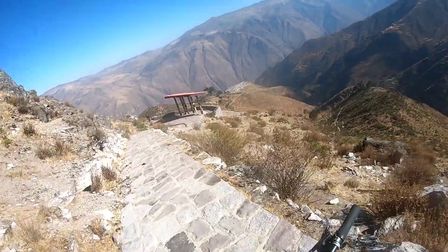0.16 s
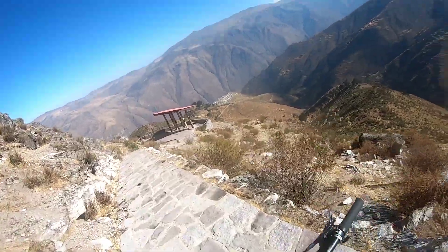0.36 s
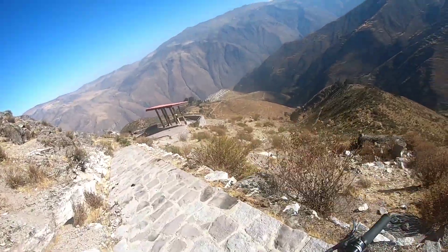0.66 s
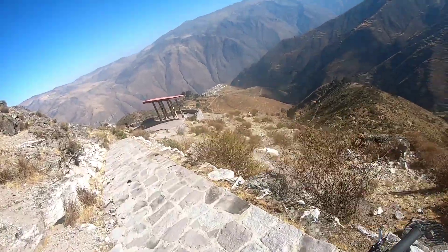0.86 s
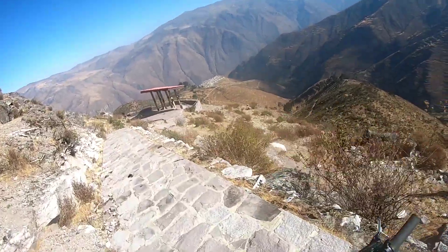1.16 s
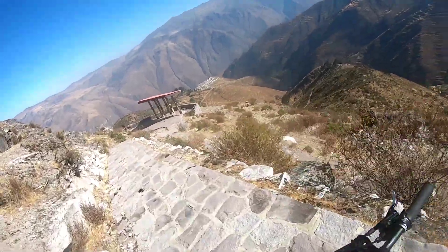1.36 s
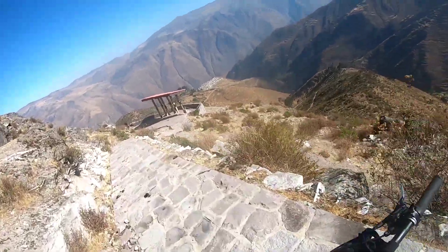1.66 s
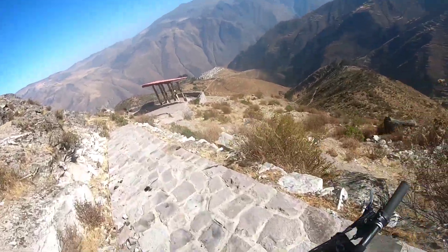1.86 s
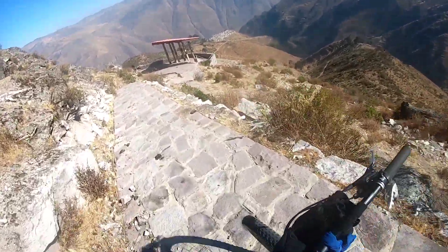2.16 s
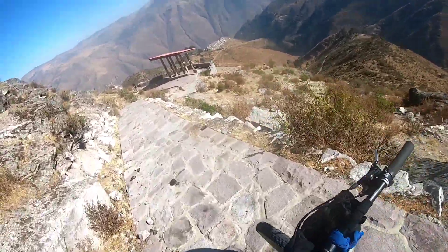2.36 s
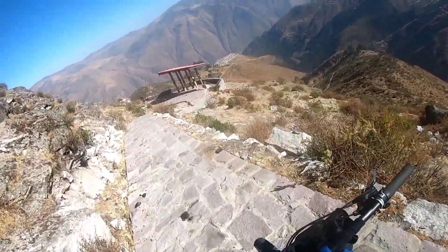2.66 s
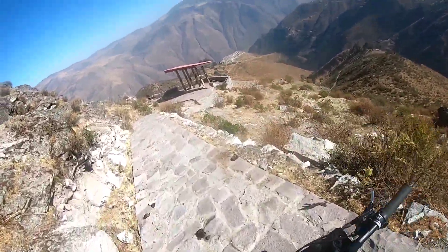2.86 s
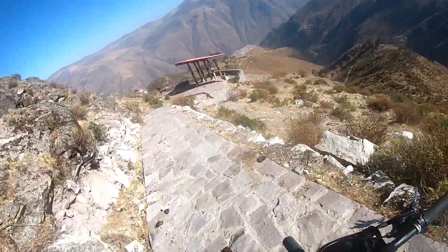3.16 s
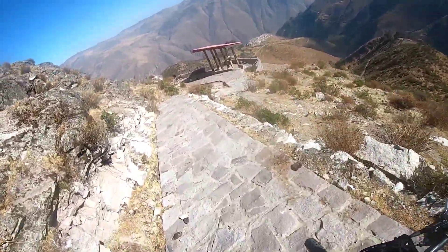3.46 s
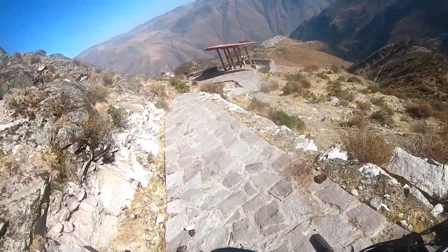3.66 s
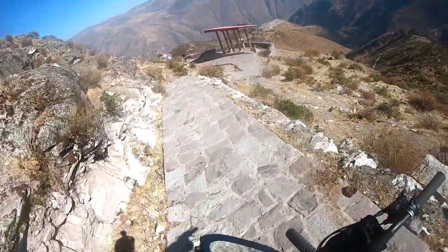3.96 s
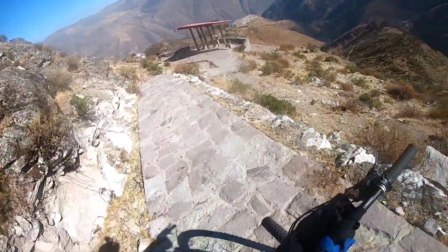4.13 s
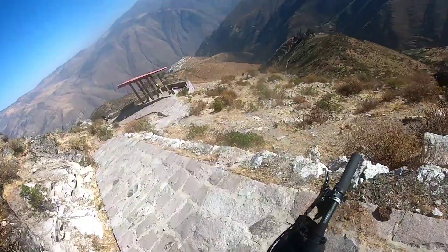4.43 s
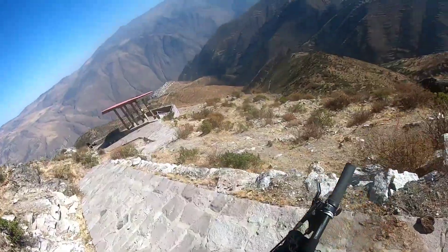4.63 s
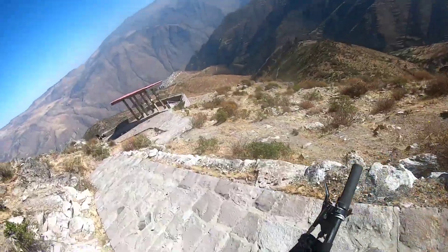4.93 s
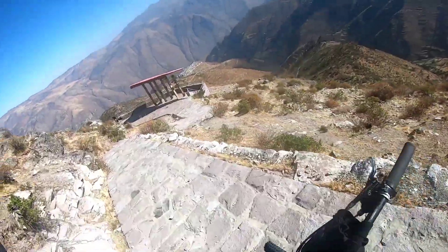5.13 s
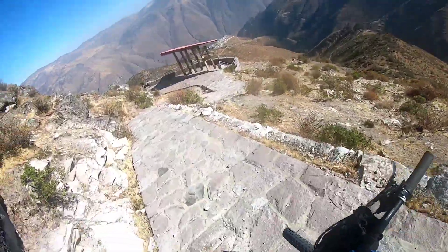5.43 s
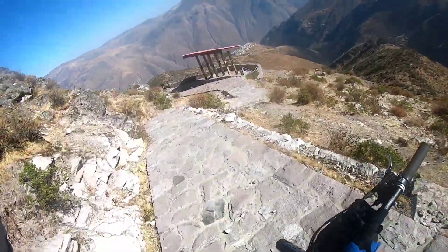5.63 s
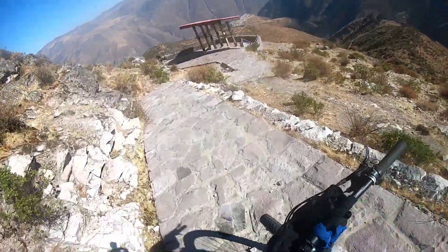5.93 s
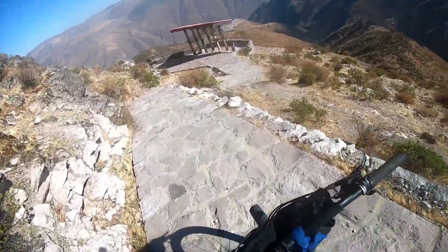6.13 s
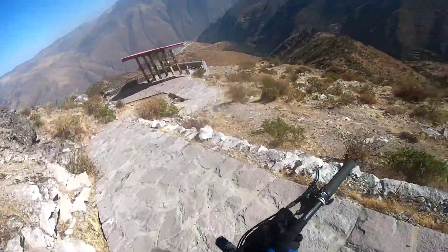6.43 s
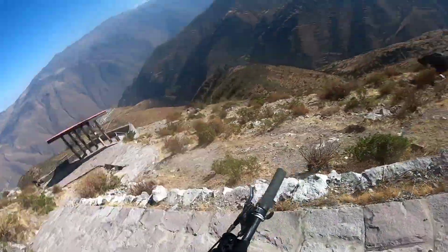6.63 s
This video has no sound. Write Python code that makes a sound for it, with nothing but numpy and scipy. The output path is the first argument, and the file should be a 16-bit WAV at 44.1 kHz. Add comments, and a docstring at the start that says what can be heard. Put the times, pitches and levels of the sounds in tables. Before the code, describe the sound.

Outdoors on an open stone path, a walker pushes a bicycle. Hard, irregular clacks of soles on slabs come with gritty scuffs and dull body thuds. A thin metallic freewheel tick runs quickly throughout, about sixteen a second. Low wind buffets the body-worn microphone in bursts, strongest in the later half, over faint airy hiss.

```python
"""Wind buffets a microphone port first, and at once hard soles clack on stone and a bicycle's freewheel ticks.
A walker wheels the bicycle along a stone path on a windy hillside; the camera they wear hears it.
Wind, hillside hiss and tyre rumble are shaped noise; scuffed grit is many tiny damped tones over hiss.
Clacks are short bursts of noise through stone resonances, and ticks are struck groups of metal tones.
Body thuds are wavering low rings; loose parts jingle, and frame and rim hum as narrow bands of noise."""
import sys
import numpy as np
from scipy import signal
from scipy.fft import rfft, irfft, next_fast_len
from scipy.io import wavfile
from scipy.ndimage import uniform_filter1d, map_coordinates

SR = 44100
rng = np.random.default_rng(int(sys.argv[2]) if len(sys.argv) > 2 else 0)


def store_pcm(level_fs):
    """Save levels as 16-bit WAV."""
    pcm = np.round(np.clip(level_fs, -1, 1) * 32767).astype(np.int16)
    wavfile.write(sys.argv[1], SR, np.atleast_2d(pcm).T)


N = 299439

# Spectra all have the columns: pitch_hz, level_db (per Hz, only the shape matters).
# Wind strength on the port. Columns: time_s, deep_db, flutter_db, roar_db
WIND_LEVELS = [(0.0, -45.5, -37.5, -54), (0.62, -35.5, -42, -55.5), (0.89, -42.5, -42.5, -57),
               (1.11, -46, -47.5, -59.5), (1.49, -36, -41, -82), (1.81, -34, -35, -50.5),
               (2.12, -33, -37.5, -45), (2.31, -37, -48, -64), (2.7, -35, -42, -53),
               (2.93, -41.5, -46, -63), (3.25, -40, -40, -45.5), (3.48, -33.5, -48, -62.5),
               (4.01, -38, -52, -73.5), (4.22, -26, -35, -44), (4.35, -37.5, -34.5, -75),
               (4.88, -31, -40, -54), (5.09, -36, -32, -48), (5.54, -37, -38, -47.5),
               (5.8, -32.5, -39.5, -60), (6.05, -34.5, -39.5, -48), (6.31, -43, -37, -71),
               (6.79, -31.5, -47, -64)]
# Bursts of buffeting. Columns: loudest_s, deep_db, flutter_db, roar_db
WIND_BURSTS = [(0.327, -43, -31, -31.5), (.46, -43, -51, -46.5), (.62, -33.5, -39, -49.5),
               (.73, -44, -36, -44), (1.26, -34.5, -25.5, -30), (1.318, -39, -45, -36),
               (1.579, -22.5, -34, -67), (1.72, -39, -27, -38.5), (1.806, -22.5, -23.5, -56.5),
               (2.221, -26.5, -24.5, -37.5), (2.675, -27.5, -20.5, -42.5), (2.87, -31, -55, -68),
               (2.99, -45, -47.5, -46.5), (3.181, -26, -31.5, -38), (3.29, -26.5, -36.5, -55),
               (3.5, -28.5, -44, -51), (3.665, -30, -24.5, -35), (3.814, -33, -37, -46),
               (4.192, -21.5, -23, -37), (4.648, -22.5, -21.5, -30), (4.961, -30, -30.5, -36.5),
               (5.123, -14, -23.5, -37), (5.21, -18, -29.5, -48), (5.501, -32, -34.5, -40),
               (5.58, -24.5, -31.5, -37.5), (5.91, -32.5, -33.5, -46.5), (6.05, -23.5, -34, -38),
               (6.139, -26, -29, -54), (6.52, -29, -26.5, -35.5)]
# Spectra of the wind's deep buffet, middle flutter and higher roar
DEEP_SPECTRUM = [(8, -40.5), (20, -6), (35, -1.5), (60, -7), (95, -14.5), (140, -59), (300, -88.5)]
FLUTTER_SPECTRUM = [(40, -48), (80, -0.5), (110, -2.5), (170, 0.5), (220, -4.5), (280, -13.5), (400, -28.5),
                    (800, -100)]
ROAR_SPECTRUM = [(150, -37), (260, -4.5), (350, -3), (500, -11.5), (700, -20.5), (1200, -71.5),
                 (3000, -110)]
# Seconds for a burst to change by 10 dB: deep, flutter, roar
BURST_RISE_S, BURST_FALL_S = (0.039, 0.034, 0.04), (0.05, 0.053, 0.027)

# Low-mid rolling rumble of the tyres. Columns: time_s, level_db
ROLLING_LEVELS = [(0.0, -56.5), (0.56, -56.5), (0.93, -69), (1.59, -78), (1.85, -62), (2.12, -52),
                  (2.27, -74), (2.5, -69), (2.61, -61), (2.88, -69), (2.97, -50.5), (3.1, -58), (3.22, -48),
                  (3.44, -65.5), (3.67, -59.5), (3.9, -72), (4.2, -58), (4.6, -73.5), (4.92, -60.5),
                  (5.03, -50), (5.6, -60), (5.73, -62), (6.09, -53.5), (6.79, -58.5)]
# Spectrum of that rumble
TYRE_SPECTRUM = [(200, -40), (330, -2.5), (450, 1.5), (650, -4), (900, -11), (1400, -27.5), (3000, -80)]

# Spectrum of the far hillside hiss
AIR_SPECTRUM = [(300, -17), (450, -8), (700, -20.5), (1000, -12), (1500, -10.5), (2500, -13.5),
                (3500, -19.5), (5000, -23.5), (6500, -32), (8000, -29), (10000, -36), (11500, -68),
                (15000, -86.5)]
AIR_DB, AIR_PATCH_DB = -66, 2.5  # middle level of the hiss; depth of its drifting patches

# Grit dragged under a sole. Columns: loudest_s, coarse_db, fine_db, rise_s, fall_s
# (rise and fall are for 10 dB; their signs are ignored)
SCUFF_EVENTS = [(.1, -67, -85, .1, 1), (.36, -53, -53, 0.085, 0.09), (.53, -65, -61, 0.039, 0.05),
                (.78, -55.5, -61, .1, 0.04), (1.25, -51.5, -59.5, 0.067, -0.32),
                (1.63, -53, -62, 0.039, -0.07), (1.73, -45, -55.5, 0.041, 0.04),
                (1.92, -57, -67.5, 0.14, 0.7), (2.1, -54, -56, 0.065, 0.1),
                (2.21, -64.5, -51, 0.021, -0.04), (2.65, -50.5, -53.5, 0.044, 0.01),
                (3.171, -59, -50.5, 0.018, -0.03), (2.5, -58.5, -66.5, .04, 0.3),
                (3.66, -52.5, -60.5, 0.076, 0.01), (4.07, -53, -64, 0.044, 0.08),
                (4.18, -68, -53, 0.027, 0.13), (4.249, -62, -67, 0.0081, 0.24),
                (4.649, -54, -59, 0.066, 0.13), (4.949, -48.5, -54.5, 0.054, 0.08),
                (5.117, -58, -48, 0.032, 0.02), (5.4, -70, -68, 0.22, .15), (5.599, -52, -55.5, 0.064, 0.1),
                (5.73, -59, -54, 0.068, 0.03), (6.05, -51, -55.5, 0.17, 0.17), (6.23, -54, -61, 0.022, .08),
                (6.42, -50, -58, 0.0625, 0.2), (6.529, -57, -55, 0.052, 0.1), (6.72, -63, -64, 0.1, 0.5)]
# Spectra of coarse and fine grit
SAND_SPECTRUM = [(250, -40), (500, 1.5), (1000, -0.5), (1600, -6.5), (2500, -12.5), (4000, -39),
                 (8000, -93)]
FINE_SPECTRUM = [(900, -38.5), (1800, -10.5), (2500, -8), (4000, -12.5), (6000, -18), (8000, -24),
                 (10500, -24.5), (12000, -64.5), (15000, -88.5)]
TYRE_COARSE_DB, TYRE_FINE_DB = -70, -79  # steady crunch under the tyres
PEBBLES_PER_S, PEBBLE_DB, PEBBLE_SPREAD_DB = 160, -4, 3.5  # larger stones flicked among the grains
GRIT_HISS_DB = -2  # hiss under the grains

# Frame tubes and rim humming. Columns: loudest_s, pitch_hz, level_db, rise_s, fall_s
# (rise and fall are for 10 dB; their signs are ignored)
HUM_EVENTS = [(.12, 638, -56, .12, 0.15), (1.06, 947, -64.5, .1, 0.3), (1.5, 638, -64, 0.11, 0.5),
              (1.64, 933, -65, 0.071, 0.2), (2.505, 1020, -56, .03, .015), (3.8, 1124, -63, .05, 0.2),
              (3.85, 3370, -71, .25, 1), (4.08, 956, -62, .25, 0.1), (4.37, 854, -61, 0.069, -0.05),
              (4.5, 1083, -61, .05, 0.5), (6.4, 3380, -73.5, .21, 3), (6.65, 1142, -58, .156, .6),
              (6.75, 620, -59, 0.13, 1)]
# Loose metal parts jingling once, before random scatter. Columns: start_s, level_db, pitch_hz, t60_s
PING_EVENTS = [(1.154, -52, 7130, 0.028), (2.618, -56.5, 7350, 0.061), (2.946, -32.5, 451, 0.088),
               (3.835, -38.5, 640, 0.072), (4.913, -52, 7140, 0.063), (5.991, -51, 5233, 0.11),
               (6.094, -54, 5253, 0.07), (6.18, -57, 5230, 0.09), (6.324, -64, 7250, .08)]
HUM_Q = 15  # pitch over width at 1 kHz for one filter pass; higher hums are sharper
RIM_HZ, RIM_DB = 5500, -94  # faint ring of the rim throughout

# Sole and stone contacts. Columns: time_s, level_db, centre_hz, knock_db, treble_db, decay_s
# (knock and treble are relative to the body; each part scales the decay)
CONTACT_EVENTS = [(0.035, -33.5, 924, 9.5, -38.5, 0.02), (0.129, -37, 1314, -1, -12, 0.0204),
                  (0.246, -36.5, 800, 6, -10.5, 0.03), (0.263, -39.5, 1170, -4, -9.5, 0.13),
                  (0.294, -32.5, 940, 3, -10, 0.2), (0.321, -19.5, 1630, 9, -9.5, 0.028),
                  (0.333, -24, 876, 8.5, -12, 0.04), (0.347, -35, 1500, 5, -8, 0.018),
                  (0.386, -31.5, 980, -12.5, -13, 0.096), (0.4, -33.5, 1400, -17, -15, 0.092),
                  (0.421, -39, 2100, -10, -8, .02), (0.432, -41, 2800, -12, -7, .02),
                  (0.508, -29.5, 975, -20, -10, 0.067), (0.515, -31.5, 1710, -19, -17, 0.03),
                  (0.535, -35.5, 2450, -19, -21.5, 0.052), (0.663, -29, 900, 5.5, -40.5, 0.024),
                  (0.732, -25.5, 870, -15, -13, 0.024), (0.763, -35.5, 940, 11.5, -20, 0.0366),
                  (1.194, -26.5, 1050, -1, -20, 0.059), (1.212, -43, 2000, -8, 1, 0.032),
                  (1.222, -46, 2600, -15, -8, 0.017), (1.247, -13.5, 1520, 7, -7.5, 0.013),
                  (1.274, -34, 1440, -2, -10, .02), (1.287, -32, 1490, 8, -8, 0.045),
                  (1.312, -20, 1260, 1, -17.5, 0.033), (1.319, -22, 1180, 3.5, -27, 0.025),
                  (1.351, -26.5, 796, -22, -20, 0.03), (1.499, -43.5, 940, -16, 1.5, 0.23),
                  (1.621, -40, 924, -7, -1, 0.12), (1.721, -18, 1120, -4, -11.5, 0.015),
                  (1.75, -36, 900, 4, -17, 0.035), (1.921, -30, 830, 6.5, -17, 0.026),
                  (1.992, -41, 806, 11, -12, 0.16), (2.026, -33.5, 1030, -17, -2.5, 0.028),
                  (2.092, -29.5, 2340, -7.5, -13.5, 0.12), (2.141, -28.5, 940, 0, -25, 0.025),
                  (2.18, -33.5, 950, 3, -6, 0.032), (2.208, -13, 1240, -5.5, -11, 0.025),
                  (2.219, -29, 990, -1, -7.5, 0.028), (2.235, -28.5, 945, 5.5, -16, 0.016),
                  (2.277, -29.5, 1010, -0.5, -21, 0.04), (2.37, -39.5, 2160, -22.5, -36, 0.087),
                  (2.475, -40.5, 1030, 0, -8, 0.12), (2.556, -39.5, 2130, 0, -25, 0.072),
                  (2.638, -23.5, 810, -1, -15.5, 0.044), (2.679, -33.5, 870, -2, -7.5, 0.12),
                  (2.707, -46, 1050, -14, 5, 0.023), (2.78, -33, 905, 3, -34.5, 0.017),
                  (3.158, -23, 900, 8, -10.5, 0.016), (3.176, -23.5, 920, 3.5, -16.5, 0.089),
                  (3.343, -34, 980, -13, -37, 0.044), (3.644, -29.5, 1010, -4, -26, 0.044),
                  (3.665, -24, 1120, -3, -22, 0.041), (3.725, -21.5, 1010, 1.5, -9.5, 0.023),
                  (3.725, -28.5, 5750, -16, -16, 0.013), (4.049, -39.5, 940, 2, -8, 0.19),
                  (4.095, -41, 2200, -12, -12, .02), (4.116, -43, 2200, -17, -3, .015),
                  (4.08, -34, 1000, -4, -9, 0.055), (4.132, -29, 790, 6, -24, 0.03),
                  (4.147, -31, 1160, -5, -14, 0.04), (4.17, -21, 1580, -5, -22, 0.032),
                  (4.175, -15.5, 1550, -0.5, -9.5, 0.053), (4.183, -31, 1510, 5, -2, .03),
                  (4.19, -26.5, 1230, 7, -21.5, 0.026), (4.211, -36, 869, 11.5, -20, 0.13),
                  (4.246, -16, 1160, 2, -13.5, 0.038), (4.255, -24, 1080, 0, -34, 0.039),
                  (4.287, -48, 1300, -8, -28, 0.018), (4.3, -34.5, 830, -1, -25, 0.044),
                  (4.548, -30.5, 1440, 6.5, -9, 0.022), (4.597, -35.5, 810, 4, -11.5, 0.31),
                  (4.651, -19, 1005, -18, -10, 0.071), (4.773, -40.5, 3360, -15, -6, 0.073),
                  (5.014, -35, 1050, 7.5, 0, 0.014), (5.11, -10, 1070, -11, -9.5, 0.073),
                  (5.125, -8, 880, -15.5, -16.5, 0.025), (5.169, -31, 940, 10, -16, 0.088),
                  (5.2, -37.5, 1090, 5.5, -19, 0.033), (5.466, -42.5, 1400, -2.5, -8, 0.034),
                  (5.528, -42.5, 1290, 1, -17, 0.041), (5.56, -30.5, 864, -18, -14.5, 0.22),
                  (5.586, -25, 1100, -2, -7.5, 0.099), (5.612, -38, 2200, -15, -10, .02),
                  (5.678, -20, 1020, -0.5, -16.5, 0.0083), (5.714, -27.5, 2160, 3.5, -28, 0.047),
                  (5.733, -33, 2210, -15.5, -13, 0.09), (5.778, -25, 1020, 2.5, -37.5, 0.024),
                  (5.953, -38, 2800, -17, -8, .025), (6.017, -31.5, 1000, 16, -32, 0.03),
                  (6.068, -21.5, 820, 2, -26, 0.049), (6.214, -37.5, 1020, -2, -10, 0.37),
                  (6.366, -39, 750, 6, -27, 0.028), (6.386, -31.5, 796, 2.5, -7, 0.052),
                  (6.417, -25, 730, -3, -7, 0.07), (6.443, -36, 2080, -5, -5, 0.026),
                  (6.519, -25, 1570, 4, -14, 0.073), (6.532, -23.5, 1320, 4.5, -13, 0.064),
                  (6.543, -32, 696, 8.5, -28, 0.026), (6.561, -32, 1180, -7, -26, 0.028),
                  (6.599, -35, 1200, -8, -22, 0.027), (6.675, -44, 1200, -4, -23, 0.017),
                  (6.705, -29.5, 1270, -5, -18, 0.031), (6.748, -35.5, 1150, 4.5, -16, 0.057),
                  (6.763, -39, 1300, -4, -7.5, .03), (6.784, -39, 1100, 1, -16, .02)]
# Slab and sole resonances. Columns: pitch_hz, width_hz, level_db (before their sum is halved)
STONE_MODES = [(726, 12, -1.5), (1004, 35, -1), (1510, 32, -12), (1680, 150, 1.5), (2800, 100, -11),
               (3440, 290, -4)]
CREST_DB, CRACK_DB = 10.5, 4.5  # allowance for a contact's peak over its rms; lift of the crack
KNOCK_LAG_S = 0.0026  # the heel's knock follows the crack
CHIP_DB, CHIP_Q = -2, 6  # loose chips ring at their own pitches

# How loud and bright the ticks are over time: body, 7-10 kHz ring, 12-14 kHz top.
# Columns: time_s, tick_db, shell_db, sizzle_db
TICK_LEVELS = [(0.05, -59, -16, -19), (0.6, -55, -18.5, -21), (1.2, -58, -11.5, -20),
               (1.8, -53.5, -20, -17), (2.35, -55, -16, -42.5), (2.9, -56, -24, -46),
               (3.45, -57.5, -15, -34), (3.8, -58, -6, -36), (4.3, -56.5, -7, -37),
               (4.7, -54.5, -19.5, -45), (4.9, -52, -11, -46), (5.22, -57.5, -1.5, -45),
               (5.4, -59, -6, -45), (5.7, -57, -11, -38.5), (6.15, -58, -6.5, -39.5), (6.7, -55, -8, -23)]
# Rolling speed. Columns: time_s, teeth_per_s
ROLLING_PACE = [(0.0, 16.61), (0.6, 16.09), (0.8, 14.49), (1.1, 14.63), (1.4, 13.81), (2.1, 18.91),
                (2.3, 13.91), (2.4, 15.78), (2.7, 16.52), (3.0, 13.18), (3.4, 13.51), (3.8, 17.73),
                (4.4, 14.89), (4.5, 17.72), (4.7, 15.62), (5.2, 16.29), (5.9, 21.84), (6.2, 17.29),
                (6.4, 16.29), (6.8, 18.48)]
# Hub and spokes: low ring, shell ring, top sizzle, before random scatter. Columns: pitch_hz, level_db, t60_s
HUB_MODES = [(1810, -14, 0.12), (2202, -0.5, 0.058), (2400, 1, 0.075), (2614, 1, 0.083), (3200, -26, .08),
             (3450, -19, 0.036), (3770, -13.5, 0.13), (4700, -22, 0.055), (5520, -9.5, 0.074)]
SHELL_MODES = [(7000, -2.5, 0.06), (7360, -3, 0.082), (7600, 0.5, 0.06), (7950, -2.5, 0.058),
               (8700, -10.5, .07), (9720, -14, 0.11), (10500, -15, 0.11)]
SIZZLE_MODES = [(12100, 8.5, .04), (12700, 3, .05), (13200, -0.5, .04), (13800, -0.5, .04)]
# Spectrum of the ratchet's rattle
RATTLE_SPECTRUM = [(900, -34.5), (1900, -8.0), (2550, 3.5), (3300, -6.5), (5500, -21.5),
                   (8000, -27.0), (10500, -22.5), (12000, -32.0), (15000, -63)]
FIRST_TICK_S, TICK_JITTER_S = .053, .0015  # first tick before jitter; pawls land unevenly
TICK_SCATTER_DB, TREBLE_SCATTER_DB = 1.5, 2.5  # from tick to tick
DETUNE = .012  # pitch scatter of a mode from blow to blow, as a fraction
SNAP_DB = -2  # dry snap at the start of a tick
SHELL_RISE_S = .006  # the shell takes up a blow slowly

# Step and wheel jolts through the camera mount. Columns: start_s, peak_db, pitch_hz, t60_s
THUD_EVENTS = [(0.22, -22.5, 191, 0.121), (0.284, -15.5, 197.2, 0.085), (0.509, -19, 139.4, 0.075),
               (0.588, -26.5, 134, 0.17), (0.644, -17, 106, 0.079), (0.733, -17, 185.4, 0.092),
               (1.204, -31, 207, 0.13), (1.246, -21.5, 323, 0.072), (1.672, -29.5, 209.7, 0.31),
               (1.878, -19, 151, 0.13), (1.924, -20, 178.4, 0.1), (1.991, -15.5, 151, 0.055),
               (2.204, -19.5, 182.7, 0.16), (2.554, -24, 144, 0.041), (2.638, -16, 195, 0.056),
               (3.155, -8.5, 200, 0.059), (3.28, -29, 193, 0.13), (3.423, -18, 177, 0.076),
               (3.641, -25, 221.4, 0.16), (4.041, -31.5, 163, 0.202), (4.184, -17, 216.5, 0.11),
               (4.31, -12, 117, 0.067), (4.878, -17, 156, 0.053), (4.945, -15.5, 97, 0.11),
               (5.004, -19.5, 163, 0.096), (5.118, -18, 109.4, 0.2), (5.498, -17, 216, 0.055),
               (5.588, -19, 189, 0.075), (5.705, -19.5, 154, 0.062), (6.053, -12, 138.5, 0.052),
               (6.216, -23, 172.4, 0.11)]
RISE_LOSS_DB = 2  # makes up for what a jolt's soft start takes off its peak

TOP_HZ = 15400  # band limit of the camera


def amp(db):
    """Turn decibels into a gain."""
    return 10 ** (np.asarray(db) / 20)


def unit(x):
    """Scale a signal to an rms of 1."""
    return x / np.sqrt(np.mean(x ** 2) + 1e-20)


def along(points, hz):
    """Read a curve of (pitch_hz, value) points on a log pitch axis."""
    f, v = np.transpose(points)
    return np.interp(np.log(hz + 1), np.log(f + 1), v)


def curves(rows):
    """Give one value per sample for each column after the time."""
    s, *cols = np.transpose(rows)
    return [np.interp(np.arange(N) / SR, s, c) for c in cols]


def wobble(rate):
    """Draw a smooth random curve with rate random points a second."""
    return map_coordinates(rng.standard_normal(int(N * rate / SR) + 4), [np.arange(N) * rate / SR])


def filtered(x, response):
    """Filter x by a gain that depends on frequency."""
    m = next_fast_len(len(x) + 8192)
    return irfft(rfft(x, m) * response(np.fft.rfftfreq(m, 1 / SR)), m)[:len(x)]


def coloured(x, spectrum):
    """Filter x by the given spectrum and scale it to an rms of 1."""
    return unit(filtered(x, lambda hz: amp(along(spectrum, hz))))


def resonance(hz, centre_hz, q):
    """Respond like a resonator that rings only after it is struck, with gain 1 at its centre."""
    return 1j * hz * centre_hz / q / (centre_hz ** 2 - hz ** 2 + 1j * hz * centre_hz / q)


def add(track, s, sound):
    """Mix a short sound in at time s."""
    part = track[round(s * SR):][:len(sound)]
    part += sound[:len(part)]


def shaped(x, envelope):
    """Put noise under an envelope, with just the energy of that envelope."""
    return unit(x * envelope) * np.sqrt(np.mean(envelope ** 2))


def swells(times, levels_db, rise_s, fall_s):
    """Make a gain from peaks that climb and sink 10 dB in the given times, added in power."""
    s, db, rise, fall = [np.reshape(v, (-1, 1)) for v in (times, levels_db, rise_s, fall_s)]
    coarse_steps = np.arange(0, N, 64)
    late = coarse_steps / SR - s
    tens_of_db_down = np.where(late < 0, -late / abs(rise), late / abs(fall))
    power = amp(2 * db - 20 * tens_of_db_down).sum(axis=0)
    return np.interp(np.arange(N), coarse_steps, np.sqrt(power))


def wind():
    """Eddies burst on the port: lumpy noise in three registers, swelling in short bursts."""
    levels_db = curves(WIND_LEVELS)
    s, *bursts_db = np.transpose(WIND_BURSTS)
    bursts = [swells(s, db, rise, fall)
              for db, rise, fall in zip(bursts_db, BURST_RISE_S, BURST_FALL_S)]
    eddy = wobble(30)  # shared by flutter and roar
    deep_lumps = amp(1.1 * wobble(8.1))
    flutter_lumps = amp(2 * eddy + 3.48 * wobble(14))
    roar_lumps = amp(2.2 * eddy + 4 * wobble(60))
    deep = unit(deep_lumps * coloured(rng.standard_normal(N), DEEP_SPECTRUM))
    flutter = unit(flutter_lumps * coloured(rng.standard_normal(N), FLUTTER_SPECTRUM))
    roar = unit(roar_lumps * coloured(rng.standard_normal(N), ROAR_SPECTRUM))
    return sum(np.hypot(amp(db), burst) * layer
               for db, burst, layer in zip(levels_db, bursts, (deep, flutter, roar)))


def tyres():
    """The tyre walls drum on the joints of the slabs: a lumpy low-mid rumble."""
    lumps = amp(4.4 * wobble(45) + 4.4 * wobble(11))
    return amp(curves(ROLLING_LEVELS)[0]) * coloured(lumps * rng.standard_normal(N), TYRE_SPECTRUM)


def hillside():
    """Wind over dry scrub hisses far off, breathing and patchy in time and pitch."""
    z = signal.stft(rng.standard_normal(N), nperseg=512)[2]
    patches = uniform_filter1d(rng.standard_normal(z.shape), size=8, axis=0)
    patches = uniform_filter1d(patches, size=12, axis=1)
    hiss = signal.istft(z * amp(AIR_PATCH_DB * unit(patches)), nperseg=512)[1][:N]
    return amp(AIR_DB + wobble(2.6)) * coloured(hiss, AIR_SPECTRUM)


def grains(per_s, low_hz, span, life_cycles, spread_db):
    """Scatter damped sines of random time, pitch and size, at rms 1; high ones are taller, so the hail is white."""
    draw = rng.random((round(per_s * N / SR), 4))
    start = (draw[:, :1] * N).astype(int)
    hz = low_hz * span ** draw[:, 1:2]
    k = np.arange(400)  # samples in a grain
    cycles = k * hz / SR
    size = hz * amp(-spread_db * np.log(1 - .97 * draw[:, 3:]))
    envelope = size * amp(-60 * cycles / life_cycles) * cycles.clip(0, 1)
    grain = envelope * np.sin(2 * np.pi * (cycles + draw[:, 2:3]))
    return unit(np.bincount((start + k).ravel(), grain.ravel(), minlength=N)[:N])


def grit():
    """Crushed grains and flicked pebbles lie on a bed of hiss; coarse and fine grit clump partly on their own."""
    s, coarse_db, fine_db, rise, fall = np.transpose(SCUFF_EVENTS)
    coarse = np.hypot(amp(TYRE_COARSE_DB), swells(s, coarse_db, rise, fall))
    fine = np.hypot(amp(TYRE_FINE_DB), swells(s, fine_db, rise, fall))
    hail = grains(1000, 500, 18, 12, 2.5)
    hail = hail + amp(PEBBLE_DB) * grains(PEBBLES_PER_S, 720, 8.9, 25, PEBBLE_SPREAD_DB)
    hail = hail + amp(GRIT_HISS_DB) * rng.standard_normal(N)
    shared_db = 2.2 * wobble(60)
    clumps = lambda depth_db: amp(shared_db + depth_db * wobble(90))
    coarse_grit = coarse * coloured(hail * clumps(2.5), SAND_SPECTRUM)
    return coarse_grit + fine * coloured(hail * clumps(2.1), FINE_SPECTRUM)


def ring(modes, t):
    """Strike a set of modes at fresh strengths and pitches, each roughened by the many spokes that share it."""
    hz, db, t60 = np.transpose(modes)[:, :, None]
    hz = hz * (1 + DETUNE * rng.standard_normal(hz.shape))
    # a smoothed random walk of the phase makes each tone rough
    drift = np.cumsum(rng.standard_normal((len(modes), len(t))), axis=1) * 0.0016 * np.sqrt(hz)
    drift = uniform_filter1d(uniform_filter1d(drift, size=24), size=24)
    fade = amp(db + 3.4 * rng.standard_normal(db.shape) - 60 * t / t60)
    return np.sum(fade * np.sin(2 * np.pi * hz * t + drift), axis=0)


def metal():
    """Loose parts jingle as struck tones, and the rolling tyres set frame and rim humming as narrow noise."""
    track, t = np.zeros(N), np.arange(SR // 6) / SR
    for s, db, hz, t60 in PING_EVENTS:
        add(track, s, (1 - np.exp(-t / 0.0018)) * ring([(hz, db, t60)], t))
    rolling = rng.standard_normal(N) * amp(2.5 * wobble(12))

    def hum(hz):
        """Narrow the rolling noise to one wavering pitch."""
        q = HUM_Q * (hz / 1000) ** .7
        return unit(amp(2.5 * wobble(35)) * filtered(rolling, lambda f: resonance(f, hz, q) ** 2))

    hums = sum(swells(s, db, rise, fall) * hum(hz) for s, hz, db, rise, fall in HUM_EVENTS)
    return track + amp(RIM_DB) * hum(RIM_HZ) + hums


def clacks():
    """Each contact is a dry burst of splinters: a quick crack, a stony body band and the heel's later knock."""
    track, t = np.zeros(N), np.arange(SR // 6) / SR
    late = t - .02  # room for the swell before the blow

    def swell(rise, t60, lag=0):
        """Climb up to the blow, then die away."""
        return np.where(late < lag, np.exp((late - lag) / rise), amp(-60 * (late - lag) / abs(t60)))

    for s, db, hz, knock_db, treble_db, decay in CONTACT_EVENTS:
        lumps = unit(uniform_filter1d(rng.standard_normal((3, len(t))), size=50))
        splinters = rng.standard_normal((3, len(t))) * amp(3.64 * lumps)
        body_chips_hz = hz * 1.714 ** rng.uniform(-0.98, 1, size=3)
        crack_chips_hz = 3000 * 1.41 ** rng.uniform(-1.04, 1, size=3)
        chips = lambda f, pitches: 1 + amp(CHIP_DB) * sum(resonance(f, c, CHIP_Q) for c in pitches)
        body_band = lambda f: resonance(f, hz, 1.05) ** 2 / (1 + 1j * f / (2.23 * hz)) ** 2
        crack_band = lambda f: resonance(f, 2520, 0.56) ** 2 / (1 + 1j * f / 6000) ** 2
        body = filtered(splinters[0], lambda f: chips(f, body_chips_hz) * body_band(f))
        crack = filtered(splinters[1], lambda f: chips(f, crack_chips_hz) * crack_band(f))
        knock = filtered(splinters[2], lambda f: resonance(f, 458, 0.99) ** 2 / (1 + 1j * f / 900))
        # each blow has a faint, quick swell before it and a weak tail after it
        low = shaped(body, swell(0.0014, 0.71 * decay) + amp(-22.5) * swell(0.0098, 0.14))
        low = low + amp(knock_db) * shaped(knock, swell(0.0024, 0.95 * decay, KNOCK_LAG_S))
        crack_swell = swell(0.0018, 0.54 * decay) + amp(-27) * swell(0.0023, 0.097)
        high = amp(treble_db + CRACK_DB) * shaped(crack, crack_swell)
        add(track, s + 0.001994 - .02, amp(db - CREST_DB) * (low + high))
    stone = lambda f: 1 + sum(amp(db) * resonance(f, hz, hz / width) for hz, width, db in STONE_MODES) / 2
    return filtered(track, lambda f: stone(f) / (1 + (f / 7500) ** 6))


def tick_times():
    """A pawl drops each time the wheel has rolled on by one tooth."""
    t = np.arange(N) / SR
    teeth = np.cumsum(curves(ROLLING_PACE)[0]) / SR
    teeth -= np.interp(FIRST_TICK_S, t, teeth)
    return np.interp(np.arange(int(teeth[-1]) + 1), teeth, t)


def freewheel():
    """Pawls snap onto the ratchet; hub and spokes ring on, with a puff of rattle."""
    track, t = np.zeros(N), np.arange(SR // 10) / SR
    rattle = coloured(rng.standard_normal(N + len(t)), RATTLE_SPECTRUM)
    level_db, shell_db, sizzle_db = curves(TICK_LEVELS)
    for s in tick_times():
        i = round(s * SR)
        db = level_db[i] + TICK_SCATTER_DB * rng.standard_normal()
        treble_db = [shell_db[i], sizzle_db[i]] + TREBLE_SCATTER_DB * rng.standard_normal(size=2)
        shell, sizzle = amp(treble_db)
        treble = shell * ring(SHELL_MODES, t) + sizzle * ring(SIZZLE_MODES, t)
        blow = ring(HUB_MODES, t) + treble * (1 - np.exp(-t / SHELL_RISE_S))
        puff = amp(-2.5 - 60 * t / 0.1) * rattle[i:i + len(t)]
        snap = amp(SNAP_DB - 60 * t / .018) * rattle[::-1][i:i + len(t)]
        sound = (blow + puff) * (1 - np.exp(-t / 0.0025)) + snap * (1 - np.exp(-t / 0.00021))
        add(track, s + TICK_JITTER_S * rng.standard_normal(), amp(db) * sound)
    return track


def thuds():
    """A jolt shakes the mount: a few cycles of a soft, wavering low ring."""
    track, t = np.zeros(N), np.arange(SR // 5) / SR
    for s, db, hz, t60 in THUD_EVENTS:
        phase = 2 * np.pi * (hz * t + rng.random())
        fade = amp(db + RISE_LOSS_DB - 60 * t / abs(t60))
        wavering = np.sin(phase + 0.61 * np.sin(phase / 2.89))
        add(track, s, fade * (1 - np.exp(-t / 0.0037)) * wavering)
    return track


def scene():
    """Everything reaches one microphone in the open air."""
    return (wind() + tyres() + hillside() + grit() + metal() + clacks() + freewheel() + thuds())[None]


def record(dry):
    """The camera keeps nothing above its band limit."""
    return filtered(dry[0], lambda hz: hz < TOP_HZ)[None]


dry = scene()
out = record(dry)
store_pcm(out)
```